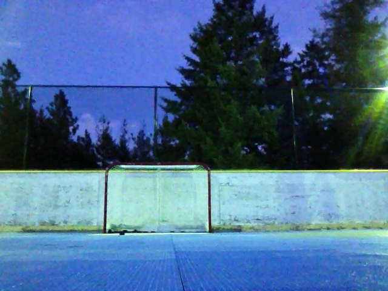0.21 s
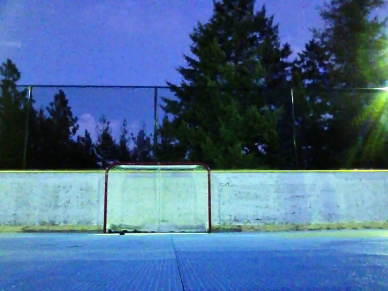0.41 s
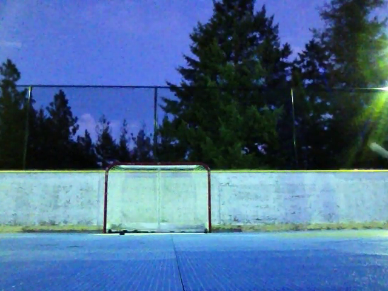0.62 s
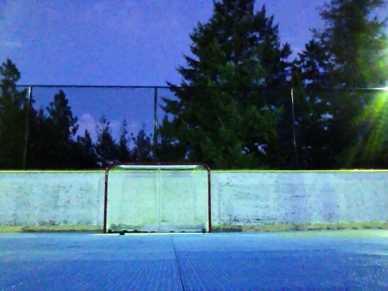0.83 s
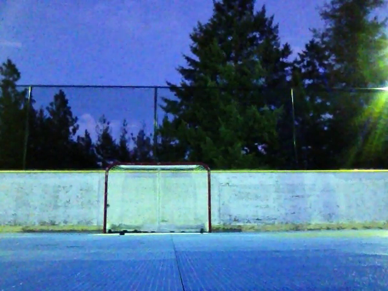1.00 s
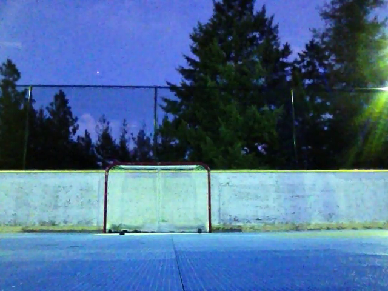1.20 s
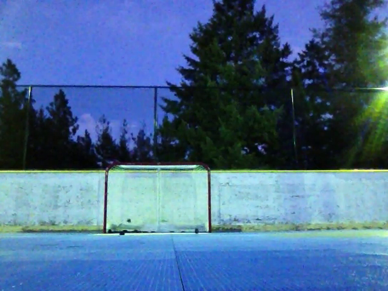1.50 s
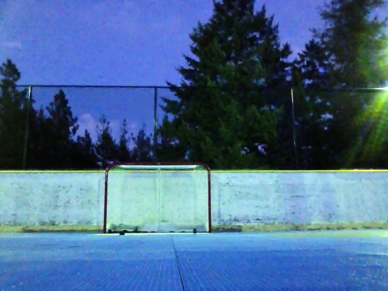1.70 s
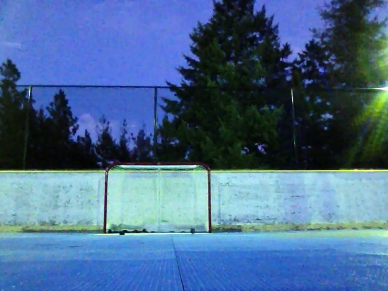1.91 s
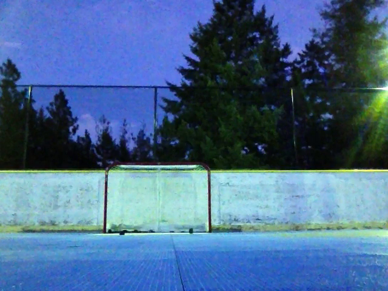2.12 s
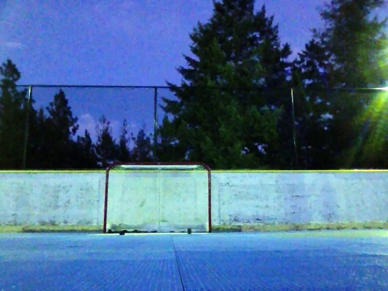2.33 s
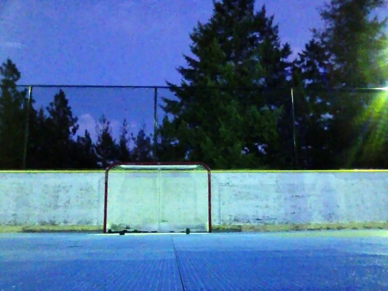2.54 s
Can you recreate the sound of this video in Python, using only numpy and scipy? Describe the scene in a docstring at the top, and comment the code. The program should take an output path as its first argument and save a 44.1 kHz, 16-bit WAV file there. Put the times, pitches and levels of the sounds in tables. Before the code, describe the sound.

A hockey stick slaps a puck with a sharp crack, the boards boom, the steel goal clinks faintly; then taps, scrapes, a hollow blade clack and a loud metallic clang, echoing on an outdoor concrete rink, in mono.

```python
"""A hockey stick slaps a puck, which booms into the boards, and the steel goal clinks on a concrete rink.
Blade, puck and feet knock on the ground and the blade scrapes, then a hard, bright hit rings the steel again.
Knocks are short bursts of noise through coloured filters or resonances; ringing steel is a set of fading tones.
Scrapes are rough noise that swells and fades. Feet and air are soft noise; the boards answer the blows and scrapes."""
import sys
import numpy as np
from scipy import signal
from scipy.fft import rfft, irfft, next_fast_len
from scipy.io import wavfile
from scipy.ndimage import map_coordinates

SR = 44100
rng = np.random.default_rng(int(sys.argv[2]) if len(sys.argv) > 2 else 0)


def output_pcm(signal):
    """Save a mono or channel-first signal as 16-bit PCM at the path in sys.argv[1].

    Samples are clipped to [-1, 1] before scaling.
    """
    pcm = np.clip(np.atleast_2d(signal).T, -1, 1) * 32767
    wavfile.write(sys.argv[1], SR, np.round(pcm).astype(np.int16))


N = 119070
T = np.arange(N) / SR
SIZE = next_fast_len(N + SR // 2, True)  # padded, so that filtered sounds have room to die away
FREQ = np.fft.rfftfreq(SIZE, 1 / SR)

# In all tables, t60 is the time in which a sound falls by 60 dB.


def amp(db):
    """Turn decibels into a gain."""
    return 10 ** (np.asarray(db) / 20)


def unit(x):
    """Scale a steady sound to rms 1."""
    return x / np.sqrt(np.mean(x ** 2) + 1e-20)


def blow(x):
    """Scale a short sound to the energy of 10 ms at rms 1."""
    return x / np.sqrt(np.sum(x ** 2) / (SR / 100) + 1e-20)


def along(points, hz):
    """Read a curve of (f/Hz, value) points on a logarithmic frequency axis."""
    f, value = np.transpose(points)
    return np.interp(np.log(hz + 1), np.log(f + 1), value)


def fade(t, t60):
    """Die away exponentially, by 60 dB in t60 seconds."""
    return np.exp(-np.log(1000) * np.maximum(t, 0) / t60)


def wobble(hz):
    """Draw a smooth random curve with hz random knots a second."""
    knots = rng.standard_normal(N // 10)
    return map_coordinates(knots, [T * hz], mode="wrap")


def filtered(x, response):
    """Pass x through a frequency response."""
    return irfft(rfft(x, SIZE) * response, SIZE)[:N]


def colour(points):
    """Make a filter of the given (f/Hz, level/dB) shape that responds only after it is struck."""
    cepstrum = irfft(np.log(amp(along(points, FREQ))), SIZE)
    # folding the second half onto the first gives the minimum-phase filter
    cepstrum[1:SIZE // 2] *= 2
    cepstrum[SIZE // 2 + 1:] = 0
    return np.exp(rfft(cepstrum))


def resonances(rows):
    """Add up resonances (f/Hz, width/Hz, level/dB) with alternating signs."""
    total = 0
    for k, (centre, width, db) in enumerate(rows):
        damping = 1j * FREQ * width
        total = total + (-1) ** k * amp(db) * damping / (centre * centre - FREQ ** 2 + damping)
    return total


def muffle(hz):
    """Dull the treble above hz with a two-pole low-pass."""
    return 1 / (1 - (FREQ / hz) ** 2 + 1j * np.sqrt(2) * FREQ / hz)


def noise(response):
    """Make coloured noise of rms 1."""
    return unit(filtered(rng.standard_normal(N), response))


def contact(t60, response):
    """Shake a body with quickly dying noise, whose pushes have random direction but no random size."""
    pushes = np.sign(rng.standard_normal(N)) * fade(T, t60)
    return blow(filtered(pushes, response))


def ring(modes, hold=0):
    """Sound the tones (f/Hz, level/dB, t60/s) at full strength for hold seconds, then let them die."""
    total = 0
    for hz, db, t60 in modes:
        tone = np.sin(2 * np.pi * (hz * T + rng.random()))
        total = total + amp(db) * fade(T - hold, t60) * tone
    return total


def swell(s, rise, fall):
    """Peak at s seconds; be 20 dB lower one rise before and one fall after."""
    before = np.maximum(s - T, 0) ** 2 / rise ** 2
    after = (T - s) / fall
    return amp(-20 * np.maximum(before, after))


def add(track, s, x):
    """Mix x into the track from s seconds on."""
    i = round(s * SR)
    track[i:] += x[:N - i]


def rink(x, wet_db):
    """Add the rink's answer: scatter from the nearest boards, a grainy tail and far boards' echoes."""
    # colour of the answer: f/Hz, level/dB
    answer_shape = [(50, -15.5), (160, -5), (500, -2), (1000, -5), (2000, -10.5), (4000, -23),
                    (9000, -12.5), (15000, -20)]
    # how fast each pitch range of the tail dies: f/Hz, t60/s
    tail_t60 = [(100, 0.2), (400, 0.84), (900, 0.89), (2000, 0.17), (5000, 0.63), (15000, 0.3)]
    # echoes of the far boards: delay/s, level/dB against the whole tail
    walls = [(0.032, -7.5), (.051, -6), (.083, -11.5), (.094, -10.5), (.102, -32)]
    rough_db, rough_hz = 2.2, 900  # depth and rate of the grain
    build_s = 0.013  # the tail builds up gradually
    near_db, near_t60 = -8.5, 0.051
    grains = rng.standard_normal(N) * amp(rough_db * wobble(rough_hz))
    hz, t, spectrum = signal.stft(grains, SR, nperseg=256)
    t60 = along(tail_t60, hz)[:, None]
    dying = spectrum * fade(t, t60) / np.sqrt(t60)
    tail = signal.istft(dying, SR, nperseg=256)[1][:N]
    tail = tail * (1 - np.exp(-T / build_s)) ** 2
    tail /= np.linalg.norm(tail)
    for s, db in walls:
        tail[round(s * SR)] += amp(db)
    near = rng.standard_normal(N) * fade(T, near_t60)
    near /= np.linalg.norm(near)
    answer = amp(wet_db) * filtered(tail, colour(answer_shape)) + amp(near_db) * near
    return x + signal.fftconvolve(x, answer)[:N]


def background():
    """Feet shuffle as low, uneven noise over the soft, steady noise of still evening air."""
    # loudness of the feet: t/s, level/dB
    feet_level = [(0, -67), (0.1, -49.5), (0.16, -47.5), (0.22, -53), (0.5, -56.5), (1.0, -46.5),
                  (1.3, -55.5), (1.57, -57.5), (1.68, -55.5), (1.82, -38.5), (2.05, -53.5), (2.13, -54),
                  (2.3, -53), (2.5, -46.5), (2.6, -42), (2.7, -52.5)]
    # colour of the feet: f/Hz, level/dB
    feet_shape = [(30, -42.5), (80, -29.5), (160, -2), (300, 2), (600, 9.5), (1000, 6), (1600, -18),
                  (4000, -25), (15000, -51)]
    # colour of the air: f/Hz, level/dB
    air_shape = [(30, -45), (80, -30), (150, -1.5), (800, 2.5), (2000, 0), (5000, -10.5), (15000, -17.5)]
    rough_db, rough_hz = 2, 120.7  # depth and rate of the unevenness
    feet = unit(noise(colour(feet_shape)) * amp(rough_db * wobble(rough_hz)))
    feet *= amp(np.interp(T, *np.transpose(feet_level)))
    air = amp(-60.5) * noise(colour(air_shape))
    return feet + air


def scrapes():
    """Grit catches under the blade dragged over concrete: rough noise, a fine hiss and short squeals."""
    # drags: t/s of the peak, level/dB, rise/s, fall/s, muffling f/Hz, fine hiss level/dB
    drags = [(0.058, -45.5, 0.039, 0.08, 3500, -12.5), (0.11, -48.5, 0.046, 0.11, 4000, -6),
             (0.602, -40.5, 0.0084, 0.046, 4840, -36.5), (0.64, -44.5, 0.032, 0.071, 4300, -28),
             (0.705, -53.5, 0.07, 0.054, 6100, -4), (0.865, -57.5, 0.036, .14, 4000, -20),
             (1.21, -49.5, 0.049, 0.1, 4176, -15.5), (1.285, -47, 0.045, 0.051, 3800, -20),
             (1.481, -47.5, 0.089, 0.16, 4430, -12), (1.665, -50, 0.059, 0.53, 2300, -20),
             (1.76, -47.5, 0.065, 0.11, 2310, -25), (1.865, -25, 0.072, 0.089, 4200, -19),
             (1.966, -26, 0.05, 0.096, 5500, -9.5), (2.035, -53, 0.035, 0.039, 3570, -13),
             (2.205, -40, 0.071, 0.23, 3400, -20), (2.30, -38, 0.047, 0.1, 4050, -12.5),
             (2.575, -42, 0.049, 0.11, 4170, -7.5), (2.66, -50.5, 0.045, 0.11, 3500, -20)]
    # colour of the coarse grit: f/Hz, level/dB
    grit_shape = [(47, -78), (80, -42.5), (252, -16), (343, -20), (556, -6), (827, -17.5), (944, -4.5),
                  (1640, -6), (1830, -4), (2600, -6), (3620, -8), (4930, -15), (15500, -43)]
    # colour of the fine hiss: f/Hz, level/dB
    hiss_shape = [(300, -43), (3000, -1), (5500, 5), (7500, 1.5), (10000, -2), (15500, -9.5)]
    # squeals: t/s of the peak, level/dB, f/Hz, width/Hz
    squeals = [(1.478, -45.5, 4160, 500), (2.2895, -31.5, 3700, 700), (2.298, -30, 3080, 500),
               (2.314, -34.5, 2850, 600)]
    squeal_rise_s, squeal_fall_s = 0.0083, 0.029
    rough_db, rough_hz = 3, 449.5  # depth and rate of the catching grit
    out, grit, hiss = np.zeros(N), colour(grit_shape), colour(hiss_shape)
    for s, db, rise, fall, hz, hiss_db in drags:
        # both noises share one roughness
        coarse, fine = rng.standard_normal((2, N)) * amp(rough_db * wobble(rough_hz))
        rub = unit(filtered(coarse, grit * muffle(hz)))
        rub += amp(hiss_db) * unit(filtered(fine, hiss))
        out += amp(db) * swell(s, rise, fall) * rub
    for s, db, hz, width in squeals:
        squeal = noise(resonances([(hz, width, 0)]) ** 2)
        out += amp(db) * swell(s, squeal_rise_s, squeal_fall_s) * squeal
    return rink(out, wet_db=-12.5)


def taps():
    """Blade, puck and feet knock on the ground: a muffled noise burst with a low thump."""
    # knocks: t/s, level/dB, t60/s, muffling f/Hz, low thump level/dB
    knocks = [(0.1291, -31.5, 0.017, 1300, -12.5), (0.163, -48, 0.046, 880, 4),
              (0.55, -41, 0.029, 5000, -16), (0.6556, -29.5, .05, 2600, -16),
              (1.082, -38, 0.037, 4200, -4.5), (1.3267, -37, 0.045, 8950, -8),
              (1.348, -45.5, 0.02, 12000, -19), (1.4399, -33.5, 0.035, 1860, -25),
              (1.6, -40.5, 0.043, 2920, -18), (1.609, -25.5, 0.031, 1970, -17),
              (1.652, -43, 0.017, 1960, -28), (2.011, -34.5, 0.024, 2980, -6),
              (2.042, -29.5, 0.032, 1850, -13), (2.081, -38, 0.013, 1790, -21),
              (2.2052, -24, 0.011, 2520, -27), (2.2495, -38.5, .006, 2930, -17),
              (2.43, -32, 0.062, 2080, -10.5), (2.574, -32.5, 0.042, 1720, -25),
              (2.635, -37, 0.11, 1900, -34)]
    # colour of the knock: f/Hz, level/dB
    body_shape = [(40, -40), (100, -30), (200, -6), (500, -2), (1000, 8), (1500, 7.5), (2300, 6.5),
                  (3500, -2), (5000, -8), (15000, -13.5)]
    # colour of the low thump: f/Hz, level/dB
    thump_shape = [(30, -38), (80, -22), (150, -1), (230, 2), (400, -8.5), (1500, -34.5)]
    thump_t60 = 0.04  # s
    out, body, thump = np.zeros(N), colour(body_shape), colour(thump_shape)
    for s, db, t60, hz, thump_db in knocks:
        knock = contact(t60, body * muffle(hz))
        knock += amp(thump_db) * contact(thump_t60, thump)
        add(out, s, amp(db) * knock)
    return rink(out, wet_db=-3)


def slap_shot():
    """The stick cracks on ground and puck, and quick reflections follow: blade, body and splintery treble."""
    # cracks and their reflections: t/s, level/dB, t60/s, splintery treble level/dB
    bursts = [(0.2039, -12.5, 0.015, -29.5), (0.2072, -14.5, 0.032, -6.5), (0.2168, -20.5, .04, -5.5),
              (0.2241, -11, 0.041, -17.5), (0.2344, -29.5, .04, -12), (0.2436, -28, .03, -10.5),
              (0.2544, -23, 0.0059, -27.5), (0.261, -27, .04, -27), (0.273, -36, .008, -30)]
    # resonances of the blade: f/Hz, width/Hz, level/dB
    blade_modes = [(1530, 100, 6), (1980, 260, 14.5), (2420, 150, -1), (2860, 77, -3), (3170, 180, -7.5),
                   (4610, 160, -27)]
    # colour of the body of the slap: f/Hz, level/dB
    body_shape = [(35, -67), (60, -27), (359, -16), (533, -7), (889, -7.5), (999, 0), (1740, -4.5),
                  (2100, -1), (2980, -1), (4030, -12), (4850, -34), (5980, -44.5), (6560, -28),
                  (13200, -31), (15500, -27)]
    # colour of the splintery treble: f/Hz, level/dB
    splinter_shape = [(1000, -21), (4000, 1.5), (7000, -4.5), (12000, -5), (15500, -4.5)]
    blade_db, body_db = -10.5, -3.5
    out, blade = np.zeros(N), resonances(blade_modes)
    body, splinter = colour(body_shape), colour(splinter_shape)
    for s, db, t60, treble_db in bursts:
        burst = amp(blade_db) * contact(t60, blade)
        burst += amp(body_db) * contact(t60, body)
        burst += amp(treble_db) * contact(t60, splinter)
        add(out, s, amp(db) * burst)
    return rink(out, wet_db=-3)


def boards():
    """The puck hits the boards: the panel booms as muffled noise, its tones ring, and duller echoes follow."""
    # hits and their later echoes: t/s, level/dB, t60/s, muffling f/Hz
    thuds = [(0.6545, -32.5, 0.087, 7000), (0.6652, -18, 0.072, 1860), (0.6702, -21.5, 0.022, 2230),
             (0.682, -21, 0.058, 1220), (0.703, -25.5, 0.045, 850), (0.734, -34, .05, 2180),
             (0.7439, -28.5, 0.073, 1800), (0.789, -33.5, 0.034, 980), (0.869, -39, 0.086, 1190),
             (0.892, -37.5, .05, 1230)]
    # colour of the boom: f/Hz, level/dB
    body_shape = [(40, -41), (80, -23), (120, -1.5), (170, -0.5), (260, -3), (340, -7.5), (500, 1.5),
                  (850, 0.5), (1200, -7), (2200, -12), (4000, -31.5), (9000, -26), (15000, -32.5)]
    # ringing tones of the panel: f/Hz, level/dB, t60/s
    panel_modes = [(106, -14, .2), (128, -12, 0.22), (145, -9, 0.18), (160, -7, 0.17), (204, -12, 0.2),
                   (224, -6, 0.24), (257, -4, .22), (402.4, -2, .28), (504, -9, 0.17), (552, -3, 0.22),
                   (643, -4, .28), (695, 3, .25), (840, 2, .18)]
    ring_db = -18
    out, body = np.zeros(N), colour(body_shape)
    for s, db, t60, hz in thuds:
        thud = contact(t60, body * muffle(hz))
        thud += amp(ring_db) * filtered(ring(panel_modes), muffle(hz))
        add(out, s, amp(db) * thud)
    return rink(out, wet_db=-5.5)


def goal():
    """Hits on steel give a thump, a bright clash that echoes once, shivering metal and a pipe's note."""
    # hits: t/s, level/dB, clash t60/s, thump level/dB, shiver level/dB, shiver t60/s
    hits = [(0.9881, -35, 0.14, 5, -10, 0.3), (1.0127, -40, 0.09, 6, -11, 0.22),
            (2.3371, -12.5, 0.12, -4.5, -8.5, 0.3)]
    # colour of the clash: f/Hz, level/dB
    clash_shape = [(100, -22), (600, -28), (1200, 5.5), (1900, -2.5), (3200, -5.5), (5200, -3), (6800, -3),
                   (8600, -1.5), (11000, -12), (13500, -18), (15500, -11.5)]
    # colour of the thump: f/Hz, level/dB
    thump_shape = [(30, -32), (100, -25), (250, 1.5), (380, -7), (560, 5.5), (900, 5), (1400, 1.5),
                   (2500, -5.5), (8000, -60)]
    # resonances of the shivering metal: f/Hz, width/Hz, level/dB
    shiver_modes = [(2055, 60, 5), (2505, 60, 6), (4500, 250, -9), (5600, 160, -0.5), (7750, 100, -34),
                    (7640, 120, -8), (9000, 110, -11), (8710, 67, 2), (10800, 480, -4.5),
                    (12280, 440, -1.5), (13840, 540, -2.5)]
    # ringing tones of the first pipe, the post: f/Hz, level/dB, t60/s
    post_modes = [(1018.5, -27.5, 0.63), (793, -49.5, 0.65), (1214, -44, 0.27), (1323, -49, 0.2),
                  (5300, -65, .3)]
    # ringing tones of the second pipe, the crossbar: f/Hz, level/dB, t60/s
    crossbar_modes = [(983, -33.5, 0.8), (1035, -36, 0.91), (1155, -40, 0.35), (1183, -50, 0.4),
                      (1293, -51, .3), (1970, -54, 0.38)]
    echo_s, echo_db = 0.083, -17.5  # the clash returns from the side boards
    thump_t60, pipe_attack_s = 0.055, 0.0037
    metal, thumps, pipes = np.zeros((3, N))
    clash, shiver, thump = colour(clash_shape), resonances(shiver_modes), colour(thump_shape)
    for s, db, t60, thump_db, shiver_db, shiver_t60 in hits:
        clang = contact(t60, clash) + amp(shiver_db) * contact(shiver_t60, shiver)
        add(metal, s, amp(db) * clang)
        add(metal, s + echo_s, amp(db + echo_db) * contact(t60, clash))
        add(thumps, s, amp(db + thump_db) * contact(thump_t60, thump))
    attack = 1 - np.exp(-T / pipe_attack_s)
    # each pipe starts at a time in s and holds its strength for a while before it fades
    add(pipes, 1.002, ring(post_modes, hold=0.088) * attack)
    add(pipes, 2.345, ring(crossbar_modes, hold=0.064) * attack)
    return rink(metal, wet_db=-2.5) + rink(thumps, wet_db=-9) + pipes


def clack():
    """The hollow blade catches the puck and chatters on it: noise bursts through its resonances and body."""
    # chatter: t/s, level/dB, t60/s
    catches = [(1.9142, -20.5, .02), (1.9182, -18.5, 0.014), (1.9238, -20.5, 0.023)]
    # resonances of the hollow blade: f/Hz, width/Hz, level/dB
    blade_modes = [(920, 115, -10), (1410, 110, -7.5), (1870, 123, 1.5), (2510, 270, -18), (2780, 250, -12),
                   (3420, 190, -6.5), (4400, 290, -14.5)]
    # colour of the body of the clack: f/Hz, level/dB
    body_shape = [(47, -62), (80, -43), (678, -7), (923, -4), (1600, -30), (1870, -2), (2600, -10.5),
                  (3540, 16), (6010, -5), (11100, -42), (15500, -54)]
    body_db = -9
    out, blade, body = np.zeros(N), resonances(blade_modes), colour(body_shape)
    for s, db, t60 in catches:
        catch = contact(t60, blade) + amp(body_db) * contact(t60, body)
        add(out, s, amp(db) * catch)
    return rink(out, wet_db=-6.5)


def scene():
    """Mix everything on the rink, in mono."""
    ground = background() + scrapes() + taps()
    blows = slap_shot() + boards() + goal() + clack()
    return (ground + blows)[None]


def record(dry):
    """Round off the highest peaks smoothly, then keep nothing from the band limit upwards."""
    top, knee = 0.8, 5  # largest size of a rounded peak, and how suddenly the rounding sets in
    limit_hz = 15500
    x = dry[0]
    rounded = x / (1 + np.abs(x / top) ** knee) ** (1 / knee)
    return filtered(rounded, FREQ < limit_hz)[None]


dry = scene()
out = record(dry)
output_pcm(out)
```